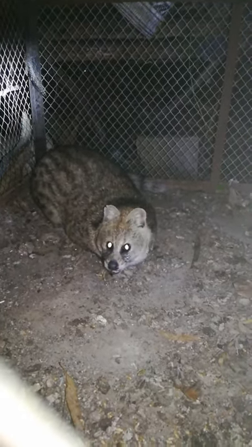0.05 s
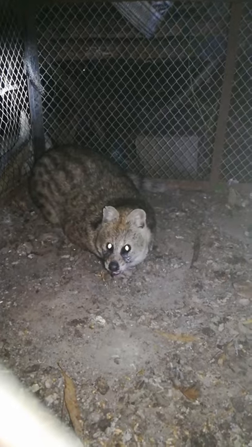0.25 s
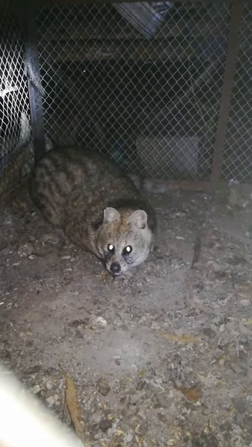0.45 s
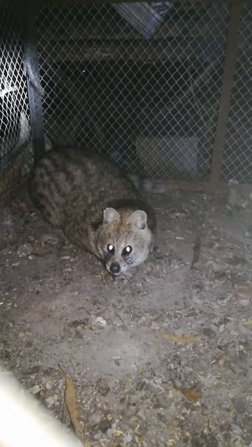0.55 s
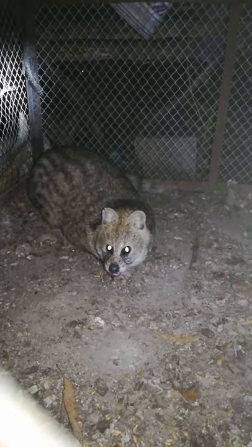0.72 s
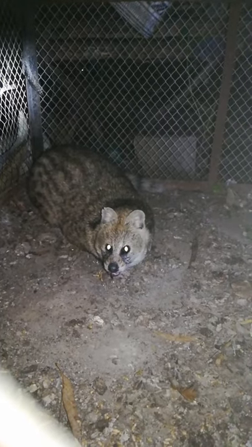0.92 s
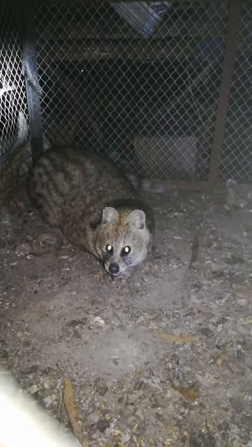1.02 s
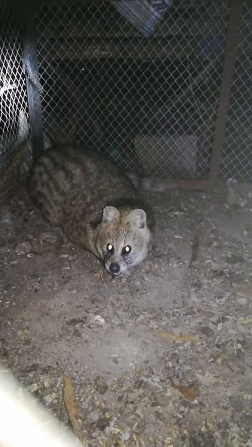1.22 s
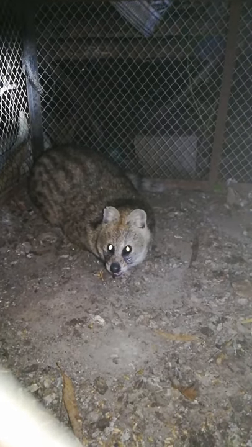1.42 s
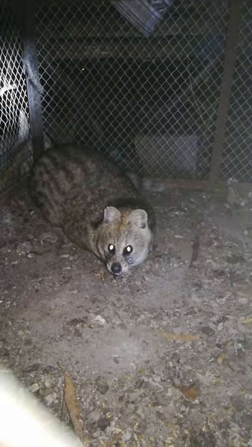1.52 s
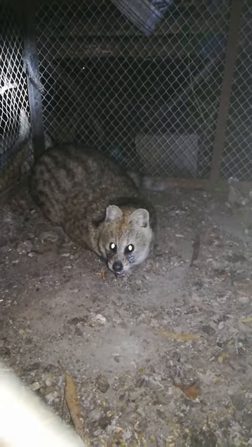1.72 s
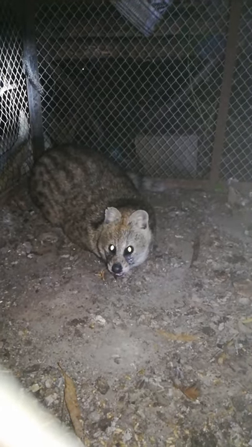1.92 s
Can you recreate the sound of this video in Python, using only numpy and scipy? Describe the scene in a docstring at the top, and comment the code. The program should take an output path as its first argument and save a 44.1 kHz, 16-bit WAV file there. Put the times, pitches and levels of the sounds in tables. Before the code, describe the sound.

A small caged animal grunts five times, then spits four harsh hisses over a rattling hum.

```python
"""Over faint room noise, a small wild animal in a wire cage gives five short, low grunts: throat
pulses with a rasp of breath. After the second, a rattling hum like a small motor's starts and runs on.
From one second in, the animal spits four harsh hisses of air past its teeth. Soft taps, a low rumble
and two clicks of grit fall among the calls, and a faint far whistle comes last.
Echoes from the floor and walls close by colour each call."""
import sys
import numpy as np
from scipy import signal
from scipy.fft import rfft, irfft, next_fast_len
from scipy.io import wavfile
from scipy.ndimage import map_coordinates

SR = 44100
rng = np.random.default_rng(int(sys.argv[2]) if len(sys.argv) > 2 else 0)


def transcribe(signal):
    """Save signal, clipped to [-1, 1], as a 16-bit WAV file at the path in sys.argv[1]."""
    frames = np.atleast_2d(signal).T
    limited = np.clip(frames, -1, 1)
    pcm = np.round(limited * 32767).astype(np.int16)
    wavfile.write(sys.argv[1], SR, pcm)


N = 85995


def grunts():
    """Throat pulses ring a low tone, then a higher one; each pulse lets out a puff of rasping air."""
    # One grunt a row: start_s, length_s, pitch_hz, level_db, swell_db, low_ring_hz, high_ring_hz,
    # chest_db, rasp_db
    calls = [(0.0269, 0.0063, 203.8, -38, -0.5, 790, 1280, 7, -12.5),
             (0.1948, 0.023, 204.2, -31.5, 8.5, 927, 1278, 3, 4),
             (0.3848, 0.023, 200.9, -32, 8.5, 816, 1033, 1.5, 2.5),
             (0.5956, 0.017, 199.6, -32, 6.5, 830, 1140, 1.5, 0.5),
             (0.7928, 0.015, 272, -32.5, -3, 850, 1071, -10, -12)]
    # Tone of the throat: frequency_hz, level_db
    throat_tone = [(60, -73), (120, -1.5), (195, 5), (410, 3.5), (540, -1.5), (800, 2.5), (1450, 0),
                   (2100, -14), (2600, -26.5), (3300, -11), (4500, -77), (7500, -51), (12000, -101)]
    # Tone of the rasping breath: frequency_hz, level_db
    rasp_tone = [(500, -33), (1500, 9.5), (3300, 12), (3900, 3.5), (4800, -13.5), (6000, -2), (7200, 6),
                 (8700, -15), (14000, -50)]
    pitch_rise_per_s, jitter_s, scatter_db = 4.5, .0001, 1.2
    release_s, fade_db_per_s, rasp_fade_s = .012, 1300, 0.0023
    chest_thinning_db, rasp_base_db = -10.5, -16
    out, t, f = 0, np.arange(N) / SR, frequencies()
    chest = 1 / (1 + (f / 340) ** 4)  # the deep part of the voice, below 340 Hz

    def ring(hz):
        return 20 * np.log10(1 + amp(5.5) * peak(hz, width_hz=110))

    for start, length, pitch_hz, level_db, swell_db, low_hz, high_hz, chest_db, rasp_db in calls:
        age = np.arange(0, length + release_s, 1 / pitch_hz)
        age = age * (1 + pitch_rise_per_s * (length - age) / 2)  # the pulses quicken
        timing, strength = rng.standard_normal((len(age), 2)).T
        effort_db = swell_db * np.minimum(age / length, 1) - fade_db_per_s * np.maximum(age - length, 0)
        train = pulses(start + age + jitter_s * timing, amp(effort_db + scatter_db * strength))
        progress = np.clip((t - start) / length, 0, 1)
        throat = curve(throat_tone) + chest_db * chest
        early = colour(train * (1 - progress), throat + ring(low_hz))
        late = colour(train * progress, throat + ring(high_hz) + chest_thinning_db * chest)
        rasp = colour(puffs(train, rasp_fade_s), curve(rasp_tone))
        call = unit(early + late) + amp(rasp_base_db + rasp_db) * unit(rasp)
        gain = amp(level_db) * np.sqrt(length * SR / N)  # allows for the silence around the grunt
        out = out + cage(-gain * call, echo_db=2)
    return out


def spits():
    """Sputtering bursts of air make a sharp hiss at the teeth and a lower rush in the mouth."""
    # Nine bursts, bunched into four hisses: start_s, hold_s, level_db, level_change_db, mouth_db,
    # brightness_db_per_octave
    bursts = [(1.0137, 0.017, -31.5, 2.5, -27, 5), (1.2212, 0.013, -24, -3, -16.5, -2.5),
              (1.2338, 0.0024, -22.5, 1, -13, 11.5), (1.2387, 0.0038, -30.5, -6, -1, -23),
              (1.41, 0.0044, -36, -24, -3.5, 5), (1.4142, 0.00082, -28.5, -1, -4, -4),
              (1.6001, 0.0036, -35.5, 2.5, -17.5, -4.5), (1.6078, 0.0029, -30.5, 5, -27.5, -1.5),
              (1.617, 0.033, -35, -2.5, -8, -2)]
    # Tone of air passing the teeth: frequency_hz, level_db
    hiss_tone = [(3000, -10.5), (3450, -17), (4050, -13.5), (4400, -16), (5100, -5), (6000, -6),
                 (6700, -4.5), (7150, -1.5), (8100, -18), (9600, -15), (10500, -27), (12000, -23),
                 (13100, -43), (14200, -25.5), (15500, -39), (16100, -45)]
    # Narrow ringing peaks in the hiss: frequency_hz, boost_db
    teeth_rings = [(4030, 5), (5220, 4), (5660, 4), (6030, 3), (6390, 4), (7090, 7)]
    # Tone of the mouth: frequency_hz, level_db
    mouth_tone = [(200, -28), (600, -7), (1050, 2), (1350, 1), (1800, 7), (2200, -5), (2900, 2),
                  (3500, -10), (6000, -42)]
    attack_s, release_s, lead_in_s, lead_in_db = 0.0014, 0.0032, 0.0033, -6.5
    low_cut_hz, sputter_db = 3030, 2.2
    out, t, f = 0, np.arange(N) / SR, frequencies()
    teeth = curve(hiss_tone) - 10 * np.log10(1 + (low_cut_hz / (f + 1)) ** 6)
    teeth += sum(db * peak(hz, width_hz=108) for hz, db in teeth_rings)
    for start, hold, level_db, change_db, mouth_db, bright_db in bursts:
        age = t - start
        before = np.minimum(age, 0)
        rise = np.maximum(np.exp(before / attack_s), amp(lead_in_db) * np.exp(before / lead_in_s))
        fall = np.exp(-np.maximum(age - hold, 0) / release_s)
        effort_db = level_db + change_db * np.clip(age / hold, 0, 1)
        loudness = rise * fall * amp(effort_db + sputter_db * wobble(changes_per_s=350))
        hiss = noise(teeth + bright_db * np.log2(1 + f / low_cut_hz))
        mouth = noise(curve(mouth_tone))
        out = out + cage(loudness * (hiss + amp(mouth_db) * mouth))
    return out


def motor():
    """Each turn repeats light knocks, ticks and three soft thumps that make loose parts chatter."""
    # How fast the motor runs: time_s, turns_per_s
    speeds = [(0.29, 27.74), (0.4, 33.28), (0.5, 30.8), (0.68, 29.96), (0.9, 29.46), (1.03, 32.62),
              (1.17, 33.06), (1.28, 35.24), (1.4, 31.49), (1.55, 31.18), (1.7, 33.35), (1.82, 30.09),
              (1.95, 28.41)]
    # Thumps in each turn: delay_s, level_db
    thump_pattern = [(.0047, -3.5), (.0123, 0), (.019, -6.5)]
    # Knocks in each turn: delay_s, level_db
    knock_pattern = [(0, -2), (.008, 0), (.0153, -7)]
    # Ticks in each turn: delay_s, level_db
    tick_pattern = [(0, 0), (.0123, -6)]
    # Tone of the motor's case: frequency_hz, level_db
    case_tone = [(30, -50), (55, -21), (85, -1), (150, -0.5), (195, -11), (280, -15), (380, -10.5),
                 (510, -8), (650, -28.5), (950, -39), (1500, -39), (3000, -63.5)]
    # Tone of the loose parts: frequency_hz, level_db
    chatter_tone = [(150, -32.5), (280, 3.5), (380, -2), (520, 4.5), (680, -12), (800, -10), (1020, -10),
                    (1400, -28), (3000, -39.5), (9000, -66)]
    # Tone of a knock: frequency_hz, level_db
    knock_tone = [(150, -22), (450, 13), (640, -12.5), (1020, 9), (1450, -21.5), (3000, -28), (9000, -66)]
    # Tone of a tick: frequency_hz, level_db
    tick_tone = [(2000, -34), (5000, -18), (6300, -1), (7300, 0), (8500, -17), (14000, -34)]
    start_s, fade_in_s, rattle_delay_s, turn_jitter_s = .286, 0.13, .025, .0009
    hum_db, chatter_db, knock_db, tick_db = -47.5, -59, -61, -75
    t = np.arange(N) / SR
    speed = np.interp(t, *np.transpose(speeds))
    turns = np.cumsum(speed * (t > start_s)) / SR
    turn_samples = np.searchsorted(turns, np.arange(int(turns[-1]) + 1), side="right").clip(0, N - 1)
    turn_times = t[turn_samples] + turn_jitter_s * rng.standard_normal(len(turn_samples))

    def strikes(pattern, scatter_db, jitter_s):
        train = 0
        for delay, db in pattern:
            timing, strength = rng.standard_normal((len(turn_times), 2)).T
            train = train + pulses(turn_times + delay + jitter_s * timing, amp(db + scatter_db * strength))
        return train

    thumps = strikes(thump_pattern, scatter_db=2.0, jitter_s=0.00026)
    hum = amp(hum_db) * unit(colour(-thumps, curve(case_tone)))
    chatter = amp(chatter_db) * unit(colour(puffs(thumps, fade_s=.003), curve(chatter_tone)))
    knocks = strikes(knock_pattern, scatter_db=2.2, jitter_s=0.0002)
    ticks = strikes(tick_pattern, scatter_db=3, jitter_s=0.00016)
    rattle = amp(knock_db) * unit(colour(knocks, curve(knock_tone)))
    rattle += amp(tick_db) * unit(colour(ticks, curve(tick_tone)))
    rattle *= t > start_s + rattle_delay_s
    fade_in = np.clip((t - start_s) / fade_in_s, 0, 1)
    speed_gain = amp(-0.19 * (speed - speed.mean()))  # a little quieter when faster
    return cage(fade_in * speed_gain * (hum + chatter) + rattle, echo_db=-4)


def taps():
    """Three soft taps, each one tone that dies away quickly."""
    # One tap a row: start_s, level_db
    hits = [(0.318, -49.5), (0.689, -46.5), (1.513, -45.5)]
    pitch_hz, fade_s = 1037, 0.0045
    out, t = 0, np.arange(N) / SR
    for start, db in hits:
        out = out + amp(db) * die_away(start, fade_s) * np.sin(2 * np.pi * pitch_hz * (t - start))
    return out


def grit():
    """Grit clicks twice, each click a tiny burst of bright noise."""
    # One click a row: start_s, level_db
    clicks = [(0.939, -51.5), (1.163, -55)]
    # Tone of the grit: frequency_hz, level_db
    grit_tone = [(1500, -7), (4500, -20), (5400, 7), (6200, -3), (7300, -2), (9000, -20), (16000, -24)]
    loudness = sum(amp(db) * die_away(start, fade_s=0.0031) for start, db in clicks)
    return loudness * noise(curve(grit_tone))


def whistle():
    """A faint far whistle: one wavering tone swells and fades."""
    middle_s, swell_s, pitch_hz, level_db = 1.858, 0.035, 1434, -62.5
    t = np.arange(N) / SR
    wavering_hz = pitch_hz * (1 + .03 * wobble(changes_per_s=250))
    phase = 2 * np.pi * np.cumsum(wavering_hz) / SR
    return amp(level_db) * np.sin(phase) * np.exp(-((t - middle_s) / swell_s) ** 2)


def rumble():
    """Deep noise swells twice during the grunts."""
    # Loudness of the rumble: time_s, level_db
    levels = [(.25, -100), (.33, -57.5), (.44, -83), (.54, -52.5), (.68, -56.5), (.8, -110)]
    # Tone of the rumble: frequency_hz, level_db
    rumble_tone = [(20, -24.5), (45, 11.5), (70, 22), (110, 24), (300, -45.5)]
    level_db = np.interp(np.arange(N) / SR, *np.transpose(levels))
    return amp(level_db) * noise(curve(rumble_tone))


def room_noise():
    """Faint steady noise, most alike on both sides in the bass."""
    # Tone of the room: frequency_hz, level_db
    room_tone = [(25, -6), (80, -2.5), (200, -10.5), (500, -12.5), (1200, -18.5), (3000, -23.5),
                 (7000, -23.5), (10000, -31.5), (16000, -34.5)]
    # How much left and right differ: frequency_hz, level_db
    spread = [(100, -32), (600, -6.0), (5000, -4.5)]
    level_db = -66
    middle = colour(rng.standard_normal(N), curve(room_tone))
    side = colour(rng.standard_normal(N), curve(room_tone) + curve(spread))
    return amp(level_db) * unit(np.array([middle + side, middle - side]))


def cage(x, echo_db=0):
    """Add echoes from the near walls, the quick ring of the cage and a faint longer tail."""
    # Wall echoes, a left list and a right list: delay_s, gain
    walls = [
        [(.00085, 0.14), (.0024, 0.66), (.0046, 0.083)],
        [(.00062, -0.56), (.0017, 0.24), (.0033, 0.7)],
    ]
    # Tone of the echoes: frequency_hz, level_db
    echo_tone = [(100, -28), (220, -13.5), (400, -8.5), (1000, -4.5), (3000, -4.5), (7000, -2),
                 (15000, -1.5)]
    # The quick ring and the longer tail: fade_s (to fall by 60 dB), level_db
    tails = [(0.06, -2), (0.27, -18.5)]
    t = np.arange(SR // 2) / SR
    build_up = 1 - np.exp(-t / .0015)
    response = 0
    for fade_s, db in tails:
        tail = rng.standard_normal((2, len(t))) * amp(-60 * t / fade_s) * build_up
        response = response + amp(db) * tail / np.linalg.norm(tail, axis=1, keepdims=True)
    for side, bounces in enumerate(walls):
        for delay, gain in bounces:
            response[side, round(delay * SR)] += gain
    echo = signal.fftconvolve(x[None], response, axes=1)[:, :N]
    return x + amp(echo_db) * colour(echo, curve(echo_tone))


def microphones(x, lean):
    """Two microphones widen the sound and favour left or right, depending on frequency."""
    # Boost to what differs between left and right: frequency_hz, boost_db
    width = [(60, 22.5), (150, 5.5), (350, 8.5), (650, 12.5), (1300, 2), (2500, 5), (5000, 4.5), (9000, 5),
             (15000, 6.5)]
    left, right = rfft(x, 2 * (len(frequencies()) - 1))
    middle = (left + right) / 2
    side = (left - right) / 2 * amp(curve(width))
    balance = amp(np.outer([1, -1], curve(lean)))
    return irfft(np.array([middle + side, middle - side]) * balance)[:, :N]


def amp(db):
    """Turn decibels into a number to multiply by."""
    return 10 ** (np.asarray(db) / 20)


def unit(x):
    """Scale a sound to an average strength (rms) of 1."""
    return x / np.sqrt(np.mean(x ** 2) + 1e-20)


def frequencies():
    """The frequencies, in Hz, that every tone curve uses."""
    return np.fft.rfftfreq(2 * next_fast_len(N * 2 // 3), 1 / SR)


def curve(points):
    """Join (frequency_hz, level_db) points into a tone curve, with octaves evenly spaced."""
    hz, db = np.transpose(points)
    return np.interp(np.log(frequencies() + 1), np.log(hz + 1), db)


def peak(hz, width_hz):
    """A bump of height 1 around one frequency."""
    return 1 / (1 + (2 * (frequencies() - hz) / width_hz) ** 2)


def colour(x, curve_db):
    """Give a sound a tone curve, so that it rings after each push and never before."""
    cepstrum = irfft(np.log(np.maximum(amp(curve_db), 1e-6)))  # the curve, laid out in time
    size = len(cepstrum)
    cepstrum[1:size // 2] *= 2
    cepstrum[size // 2 + 1:] = 0
    return irfft(rfft(x, size) * np.exp(rfft(cepstrum)), size)[..., :N]


def noise(curve_db):
    """Steady noise with the given tone curve."""
    return unit(colour(rng.standard_normal(N), curve_db))


def pulses(times, gains):
    """Pushes one sample long at the given times."""
    samples = np.maximum(np.round(times * SR), 0).astype(int)
    return np.bincount(samples, gains, minlength=N)[:N]


def puffs(train, fade_s):
    """Turn each push into a fading puff of noise."""
    loudness = signal.lfilter([1], [1, -np.exp(-1 / (fade_s * SR))], train)
    return loudness * rng.standard_normal(N)


def die_away(start_s, fade_s):
    """A loudness that jumps to 1, then fades."""
    age = np.arange(N) / SR - start_s
    return (age > 0) * np.exp(-np.abs(age) / fade_s)


def wobble(changes_per_s):
    """A smooth random curve."""
    return map_coordinates(rng.standard_normal(4096), [np.arange(N) * changes_per_s / SR], mode="wrap")


def scene():
    """The animal's calls over the motor, the small sounds and the room."""
    # How the grunts lean left (+) or right (-): frequency_hz, lean_db
    grunt_lean = [(150, -3), (350, -3), (700, 0.5), (1400, 3.5), (2800, -1), (6000, -4), (10000, -0.5)]
    # How all other sounds lean: frequency_hz, lean_db
    other_lean = [(150, -0.5), (350, -0.5), (700, 0.5), (1400, -3.5), (2800, 2.4), (6000, -1.35),
                  (10000, 0.5)]
    voice = microphones(grunts(), grunt_lean)
    others = spits() + motor() + cage(taps() + grit() + whistle()) + rumble() + room_noise()
    return voice + microphones(others, other_lean)


def record(dry):
    """Cut off the very highest treble."""
    top_hz, f = 16300, frequencies()
    return irfft(rfft(dry, 2 * (len(f) - 1)) * (f < top_hz))[:, :N]


dry = scene()
out = record(dry)
transcribe(out)
```